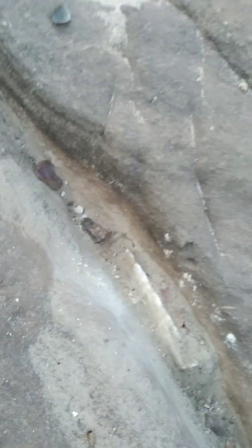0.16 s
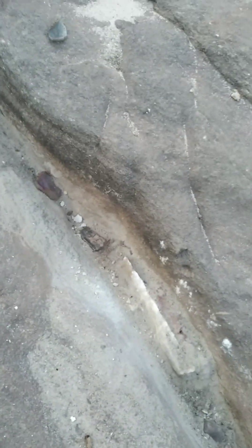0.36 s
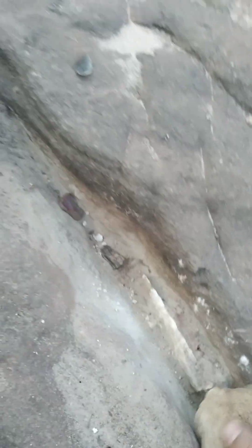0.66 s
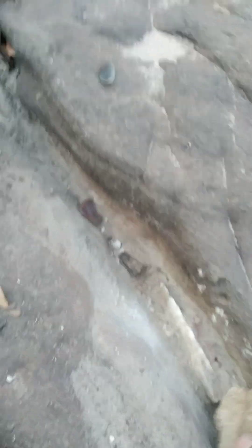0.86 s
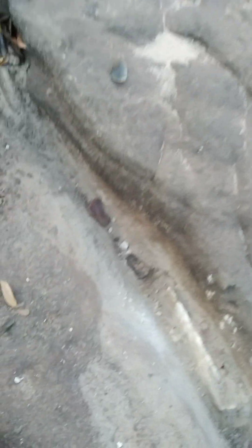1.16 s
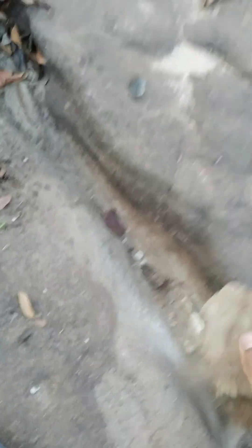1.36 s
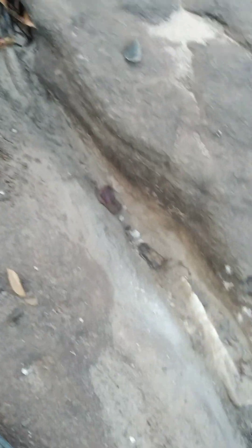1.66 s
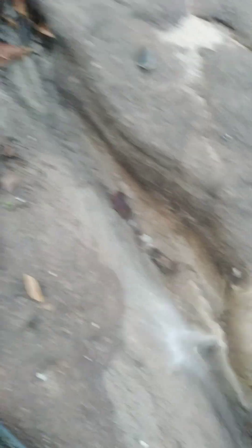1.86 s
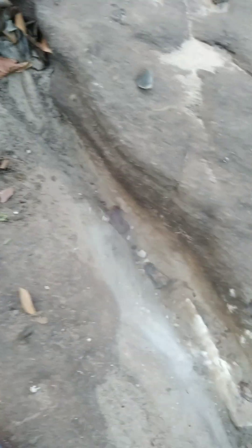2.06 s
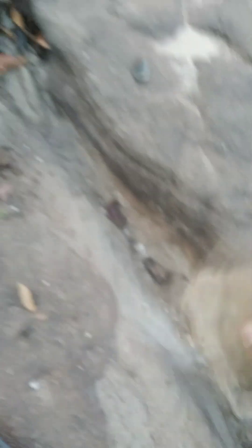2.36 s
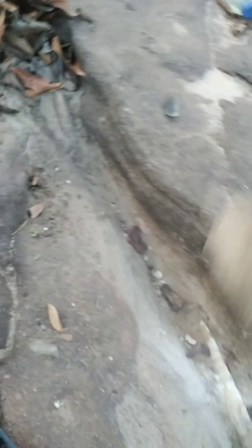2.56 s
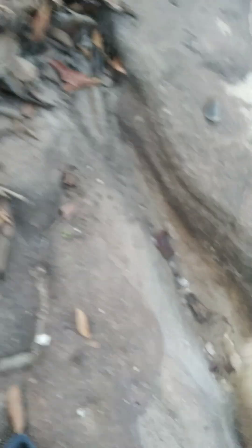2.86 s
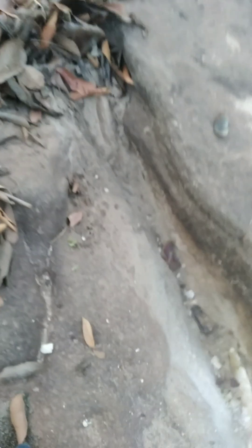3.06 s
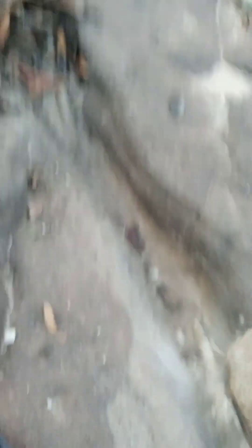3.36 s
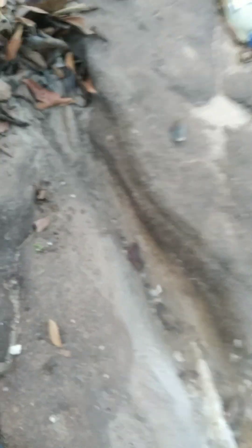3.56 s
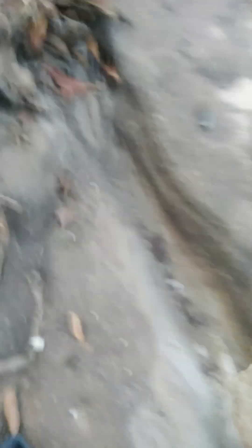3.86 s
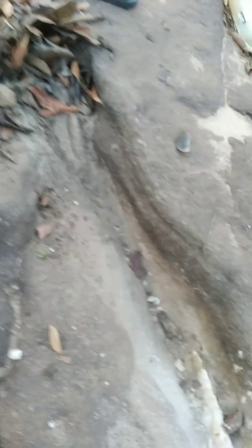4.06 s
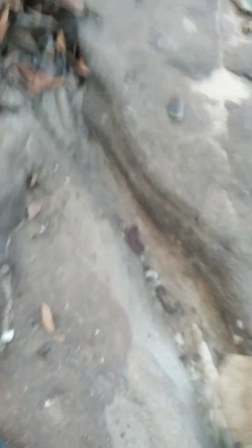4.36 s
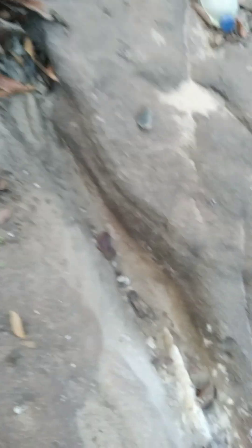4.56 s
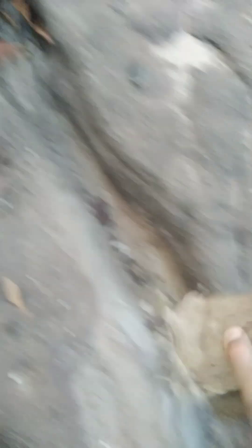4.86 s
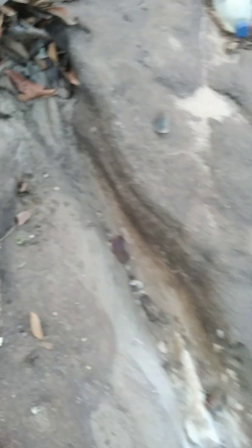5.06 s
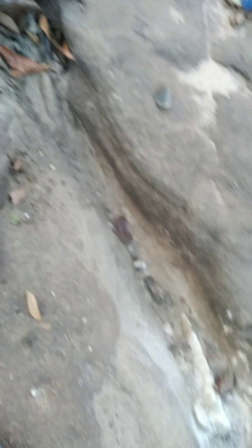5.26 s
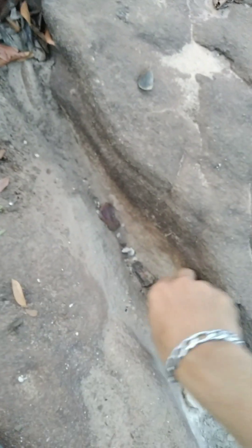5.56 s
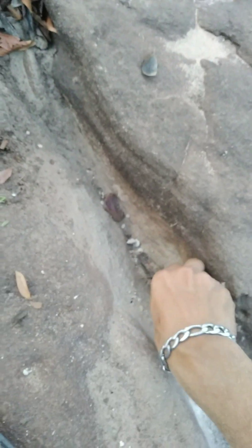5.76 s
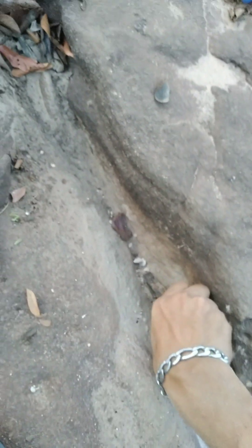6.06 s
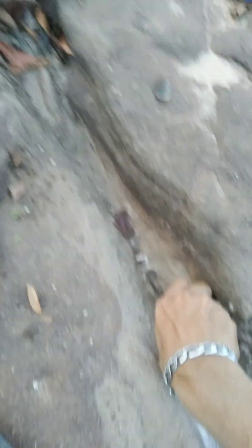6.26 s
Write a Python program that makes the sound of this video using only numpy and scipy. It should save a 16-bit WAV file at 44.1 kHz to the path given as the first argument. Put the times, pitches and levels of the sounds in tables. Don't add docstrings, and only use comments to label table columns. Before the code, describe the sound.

Outdoors on bare rock, with a faint dull wash and low rumble far off. From 0 to 0.9 s a stone is shifted in the hand: quiet gritty scrapes, small clicks and light taps close by. A near-quiet gap follows. At about 1.3 s the first hard knock lands on bedrock, then more at 1.9, 2.4, 2.9, 3.4, 3.9, 4.4 and 4.9 s, eight in all. Each is a loud, dry, very short clack with quick rebounds, a dull thud beneath and a crunch of grit, overloading the microphone on the right; the left is much softer. Between blows chips drop, sand slides and grains tick faintly. After a pause, from 5.4 to 6.2 s, the stone is set down with softer knocks, scraping and rocking among loose chips before near-quiet returns.

```python
import sys
import numpy as np
from scipy import signal
from scipy.io import wavfile
from scipy.ndimage import uniform_filter1d

SR = 44100
rng = np.random.default_rng(int(sys.argv[2]) if len(sys.argv) > 2 else 0)


def convert_level_to_amplitude(level_db):
    exponent = np.asarray(level_db, float) / 20
    return 10 ** exponent


def to_wav(sig):
    pcm = np.clip(np.atleast_2d(sig), -1, 1) * 32767
    pcm = np.round(pcm).astype(np.int16)
    wavfile.write(sys.argv[1], SR, pcm.T)


N = 282448

# start in seconds, ring level in dB, thud level in dB, crack level in dB.
BLOWS = [(1.3316, -23.5, -11, -31), (1.3337, -23, -20, -31), (1.8884, -5.5, -25, -32.5),
         (1.8900, -9, -8.5, -36.5), (2.4179, -2.5, -9, -24.5), (2.419, -11, -13, -23.5),
         (2.8804, -5, -8.5, -24), (2.8894, -14, -7, -28.5), (3.3722, -26.5, -30, -35.5),
         (3.3734, -1, -8, -25), (3.3747, -12, -16.5, -30.5), (3.4064, -13.5, -18, -17),
         (3.8609, -23, -35.5, -36), (3.8614, -5, -10, -27.5), (3.8640, -11.5, -20, -35),
         (4.3718, -3, -13, -25), (4.3740, -6, -15, -45), (4.3781, -6, -14, -46.5),
         (4.8835, -12, -13, -21.5), (4.8850, -5.5, -22, -54)]
# start in seconds, ring, thud and crack levels in dB.
SHIFTS = [(0.119, -65, -52, -75), (0.262, -45, -45, -86), (0.3144, -64, -52, -86), (0.3442, -58, -54, -73),
          (0.406, -52, -70, -81), (0.4394, -50, -42, -78), (0.539, -34.5, -55, -65),
          (0.6421, -56, -38, -52), (0.788, -41.5, -56, -65), (0.8017, -40, -30, -49),
          (0.8652, -47, -56, -54.5)]
# start in seconds, ring, thud and crack levels in dB.
FALLS = [(1.9588, -31, -33, -56), (2.1023, -31.5, -41.5, -50.5), (2.172, -36, -46, -56),
         (2.25, -52, -55, -59), (2.3113, -64, -72, -59), (2.7032, -30, -66, -37), (2.7861, -46, -61, -55.5),
         (3.03, -44.5, -46, -56.5), (3.4356, -30, -36, -44), (3.7462, -42, -62, -50.5),
         (3.9172, -36, -36, -60), (4.5131, -50, -57, -65.5)]
# start in seconds, ring, thud and crack levels in dB.
SET_DOWN = [(5.3683, -23, -24, -41), (5.4063, -24, -30, -64), (5.4477, -40, -12.5, -57.5),
            (5.4779, -40.5, -28.5, -66.5), (5.4974, -43, -66, -57), (5.5612, -28.5, -33, -44),
            (5.6569, -56, -34, -55), (5.6738, -60, -42.5, -59), (5.702, -46, -75, -57.5),
            (5.8084, -36, -25, -54), (5.8384, -30, -27, -68), (5.896, -68, -44, -43.5),
            (5.9029, -38, -32, -48), (6.0028, -49, -48, -48), (6.0529, -31, -23, -42),
            (6.1488, -49, -58, -61)]
# start in seconds, level in dB.
SLIPS = [(0.002, -48), (0.029, -43), (0.047, -43), (0.057, -43), (0.084, -44), (0.096, -42), (0.444, -43),
         (0.472, -35), (0.488, -36), (0.508, -33), (0.52, -38), (0.53, -36), (0.54, -33), (0.56, -39),
         (0.566, -39), (0.615, -42), (0.627, -36), (0.667, -36), (0.726, -54), (0.847, -39), (2.907, -35),
         (2.917, -32), (2.933, -31), (2.944, -26), (3.884, -32), (3.899, -34), (4.409, -34), (4.433, -36),
         (4.448, -38), (4.908, -33), (4.924, -30), (4.946, -32), (5.585, -37), (5.919, -40), (5.948, -41),
         (5.972, -48), (6.017, -37), (6.03, -30), (6.074, -45), (6.112, -49)]


def rms_one(x):
    return x / np.sqrt(np.mean(x ** 2) + 1e-20)


def at_hz(points, hz):
    table_hz, value = np.transpose(points)
    return np.interp(np.log(hz), np.log(table_hz), value)


def drift(rate):
    knots = rng.standard_normal(1500)
    return np.interp(np.arange(N) * rate / SR, np.arange(len(knots)), knots)


def wash(patchy_db):
    # frequency in Hz, density in dB per Hz.
    spectrum = [(20, 0), (40, -5), (65, -5.5), (100, -9), (150, -10.5), (220, -14.5), (330, -15),
                (555, -20.5), (800, -24), (1830, -29.5), (3460, -42), (8000, -54.5), (15000, -58.5)]
    # frequency in Hz, left over right in dB.
    balance = [(25, 3.5), (60, -8), (200, -7), (1000, -3.5), (4000, -1), (10000, -4.5)]
    # frequency in Hz, likeness of the two ports from 0 to 1.
    likeness = [(40, .25), (160, 0.97), (500, 0.2), (1500, .02)]
    # time in seconds, overall level in dB.
    swell = [(0.0, -50), (0.28, -56.5), (0.66, -53.5), (1.0, -57.5), (5.1, -56.5), (5.55, -56),
             (5.95, -52.5), (6.15, -57.5)]
    out = 0
    edges = 20 * 2 ** np.arange(0, 9.8, .5)
    white = rng.standard_normal((2, 2, N))
    for k, (low, high) in enumerate(zip(edges, edges[1:])):
        band = signal.butter(2, [low, high], "band", fs=SR, output="sos")
        mid, side = signal.sosfilt(band, white[k % 2])
        hz = np.sqrt(low * high)
        alike = np.clip(at_hz(likeness, hz), 0, 1)
        lean = at_hz(balance, hz) / 2
        pair = np.sqrt(1 + alike) * mid + np.sqrt(1 - alike) * side * [[1], [-1]]
        flicker_db = patchy_db * (drift(7.5) + 15 / (hz + 20) * drift(25))
        out = out + convert_level_to_amplitude(at_hz(spectrum, hz) + flicker_db) * pair * convert_level_to_amplitude(np.array([[lean], [-lean]]))
    s, level_db = np.transpose(swell)
    return rms_one(out) * convert_level_to_amplitude(np.interp(np.arange(N) / SR, s, level_db) + .5)


def drones(left_db):
    # frequency in Hz, width in Hz, level in dB.
    rumbles = [(65, 22, -63.5), (156, 18, -66)]
    out = np.zeros((2, N))
    for hz, width_hz, level_db in rumbles:
        r = np.exp(-np.pi * width_hz / SR)
        white = rng.standard_normal((2, N))
        resonance = [1, 0, -1, 1, -2 * r * np.cos(2 * np.pi * hz / SR), r * r]
        hum = signal.sosfilt([resonance] * 2, white + 0.95 * white[1])
        out += rms_one(hum) * convert_level_to_amplitude(level_db + np.array([[left_db], [0]]))
    return out


def grit_levels():
    # start in seconds, length in seconds, start and end levels in dB.
    crush = [
        (1.338, .05, -44.5, -56),
        (1.895, .035, -49, -56),
        (2.426, .055, -43, -50),
        (2.892, .037, -31, -40),
        (2.93, .022, -37.5, -37.5),
        (3.38, .025, -28, -51.5),
        (3.869, .055, -35, -47.5),
        (4.382, .04, -41, -34.5),
        (4.427, .032, -40.5, -47.5),
        (4.886, .065, -43, -37),
    ]
    # start in seconds, length in seconds, start and end levels in dB.
    drags = [(0.028, .085, -45.5, -48.5), (0.442, .04, -44.5, -55), (0.478, .07, -43.5, -45),
             (.558, .015, -37, -43.5), (0.614, .035, -41.5, -51.5), (0.677, .07, -64, -58),
             (0.841, .028, -42, -64), (1.08, .14, -65, -66.5), (1.943, .025, -38, -58),
             (5.578, .04, -43.5, -55.5), (5.62, .16, -63, -56), (5.78, .07, -55.5, -48),
             (5.895, .075, -40, -49), (5.97, .03, -50, -57), (5.998, .04, -47, -40.5),
             (6.07, .085, -47, -57), (6.2, .06, -67, -54.5)]
    # start in seconds, length in seconds, start and end levels in dB.
    settle = [(0, .03, -51.5, -53.5), (.12, .13, -68, -71), (.786, .04, -58, -56), (2.479, .08, -67, -66.5),
              (2.952, .05, -65, -57), (3.41, .045, -52, -56.5), (3.929, .11, -62, -59),
              (5.369, .16, -61, -69)]
    # start in seconds, length in seconds, start and end levels in dB.
    sand = [(0.659, .018, -48, -57), (1.57, .04, -68, -70), (1.998, 0.022, -62, -71),
            (2.066, .04, -46.5, -52.5), (2.105, .045, -58, -66), (2.61, .03, -61, -71),
            (2.684, .035, -48.5, -61.5), (3.502, .2, -58, -79.5), (4.104, .025, -54, -62),
            (4.5, .04, -67, -62.5), (5.547, .032, -58.5, -65)]
    t, shares = np.arange(N) / SR, np.zeros((3, N))
    for rows, bright_db, dull_db in [(crush, -16.5, -1.5), (drags, -11, -4), (settle, -10, 7.5), (sand, -4.5, -3)]:
        for s, length, start_db, end_db in rows:
            part = slice(int(s * SR), int((s + length) * SR))
            level_db = np.interp(t[part], [s, s + length], [start_db, end_db])
            shares[:, part] += convert_level_to_amplitude(level_db + np.array([[0], [bright_db], [dull_db]]))
    return shares


def grit(per_s, uneven_db, trickle_per_s, trickle_db):
    clumps = convert_level_to_amplitude(4 * drift(60) + 6 * drift(170))
    draw = rng.random(N)
    sizes = convert_level_to_amplitude(uneven_db * np.minimum(rng.exponential(1, N), 4))
    dragged = grit_levels() * rms_one((draw < per_s * clumps / SR) * sizes)
    trickle = convert_level_to_amplitude(trickle_db + np.array([[0], [-4], [-6]]))
    fallen = (draw > 1 - trickle_per_s / SR) * np.minimum(sizes, 2) * trickle
    at = np.flatnonzero(dragged[0] + fallen[0])
    return at, (dragged + fallen)[:, at]


def contacts(starts, chatter_s):
    delays = np.cumsum(rng.uniform(.4, 1, (len(starts), 3)), axis=1) * chatter_s - chatter_s
    return ((starts[:, None] + delays) * SR).astype(int)


def ring(clicks, hz, t60, lead):
    r, w = convert_level_to_amplitude(-60 / (t60 * SR)), 2 * np.pi * hz / SR
    softness = 0.36
    q = np.exp(-hz / SR / softness)
    rounding = [(1 - q * q) / 2, 0, (q * q - 1) / 2, 1, -2 * q * np.cos(w), q * q]
    mode = [np.sin(lead), r * np.sin(w - lead), 0, 1, -2 * r * np.cos(w), r * r]
    return signal.sosfilt([rounding, mode], clicks + 1e-18)


def stone(spread_db, grit_left_db):
    # frequency in Hz, level in dB, t60 in seconds, left level in dB, left lead in rad.
    low_modes = [(60, -20, .022, -3.5, .3), (140, -14.5, 0.018, -3, 0.23), (290, -18, 0.015, -1.5, 0.27),
                 (454, 7, 0.0091, -2.5, 0.87), (598, -2.5, 0.0067, -4, 0.47)]
    # frequency in Hz, level in dB, t60 in seconds, left level in dB, left lead in rad.
    middle_modes = [(844, 0, 0.017, -3.3, 0.5), (1000, -2, 0.017, -1.2, 1.4), (1170, -7, 0.0083, 0, 2.5)]
    # frequency in Hz, level in dB, t60 in seconds, left level in dB, left lead in rad.
    upper_modes = [(1522, -1, 0.016, 1, 3.24), (1574, 1, 0.013, -1.5, 4), (1806, -3.5, 0.018, 1, 3.45),
                   (2241, 1, 0.014, 1.5, 1.57), (2450, -7, 0.014, 0.5, 5.4), (2770, -8.5, 0.012, 8.5, -2)]
    # frequency in Hz, level in dB, t60 in seconds, left level in dB, left lead in rad.
    top_modes = [(3156, 6.5, 0.0047, -1, 8), (3550, -6, 0.013, -3, 1.5), (4000, -6.5, 0.012, 1, 11.5),
                 (4280, -5, 0.0066, 7.5, 1), (5600, -5.5, 0.0034, -2.5, 7.4), (6900, -9.5, 0.002, -6, -3.7),
                 (8200, -16, 0.0023, -7.5, 5.5), (10500, -25, .004, -8, 1.5), (12700, -35, .003, -8, -2.9)]
    # middle modes over the mean of ring and thud in dB, left over right in dB
    kinds = [(BLOWS, 0.5, -14), (SHIFTS, 10, -15), (FALLS, -9, -11), (SET_DOWN, 1.5, -13)]
    rows = np.array([(s, ring_db, thud_db, (ring_db + thud_db) / 2 + over_db, crack_db, side_db)
                     for kind, over_db, side_db in kinds for s, ring_db, thud_db, crack_db in kind])
    starts, ring_db, thud_db, middle_db, crack_db, side_db = rows.T
    touch = contacts(starts, chatter_s=.0008)
    grain, (plain, bright, dull) = grit(per_s=1900, uneven_db=4, trickle_per_s=40, trickle_db=-54)
    # modes, push of each contact in dB, push of each grain, likeness of the grains at the two ports
    groups = [(upper_modes, ring_db - 5, convert_level_to_amplitude(-25) * plain, 0.13), (low_modes, thud_db + 3, convert_level_to_amplitude(-23.5) * dull, 0.59),
              (middle_modes, middle_db + 1.5, convert_level_to_amplitude(-20) * dull, 0.28), (top_modes, crack_db + 5, convert_level_to_amplitude(-23) * bright, 0.1)]
    out = np.zeros((2, N))
    for modes, push_db, snaps, alike in groups:
        for hz, mode_db, t60, left_db, lead in modes:
            force = np.zeros((2, N))
            chance = rng.standard_normal((len(rows), 4))
            rebounds = np.c_[np.ones(len(rows)), .3 * chance[:, 1:3]]
            size = convert_level_to_amplitude(push_db + spread_db * chance[:, 0])[:, None] * rebounds
            np.add.at(force[1], touch, size)
            np.add.at(force[0], touch, size * convert_level_to_amplitude(side_db[:, None] + 2 * chance[:, 3:]))
            own, shared = rng.standard_normal((2, len(grain)))
            sharp = max(hz / 4000, 1) ** .7
            grain_left = convert_level_to_amplitude(grit_left_db) * (alike * shared + (1 - alike) * own)
            force[:, grain] += sharp * snaps * [grain_left, shared]
            out[0] += convert_level_to_amplitude(mode_db + left_db) * ring(force[0], hz, t60, lead)
            out[1] += convert_level_to_amplitude(mode_db) * ring(force[1], hz, t60, 0)
    return out


def slips(spread_db):
    # frequency in Hz, level in dB.
    slip_modes = [(520, -12), (1000, 1), (1600, -3), (2300, -2), (3300, -17), (4400, -16), (6500, -26)]
    chance = rng.standard_normal((len(SLIPS), len(slip_modes), 2))
    taps = []
    for (s, level_db), row in zip(SLIPS, chance):
        for (hz, mode_db), (late, odd) in zip(slip_modes, row):
            taps.append((s + .0004 * late, hz, level_db + mode_db - 1 + spread_db * odd))
    return taps


def rings():
    # start in seconds, frequency in Hz, level in dB.
    blow_rings = [(1.3335, 2850, -22), (1.3321, 450, -2), (1.3325, 4250, -28), (1.3315, 755, -5),
                  (1.3330, 1466, -4), (1.8885, 670, -1), (1.8893, 3500, -15), (1.8898, 960, -4),
                  (1.8890, 1690, -6.5), (1.8895, 2450, -5), (1.8906, 3120, -13), (1.889, 4350, -24),
                  (2.418, 3470, -15), (2.418, 4570, -22), (2.4192, 1000, -5), (2.4186, 1550, -12),
                  (3.374, 5500, -24), (3.3738, 2260, -6), (3.374, 3350, -18), (3.406, 2060, -18),
                  (4.8849, 441, -3), (4.884, 3400, -12), (4.374, 700, -6), (4.374, 1170, -9),
                  (2.4185, 520, -11), (2.4180, 833, 2), (2.4176, 2301, -7), (2.88, 395, -12),
                  (2.8800, 806, 2), (2.8888, 673, -1), (2.8885, 1537, -3.5), (3.374, 390, -1),
                  (3.372, 511, -4), (3.374, 990, 1), (3.4069, 508, -15), (3.4062, 5500, -21),
                  (3.4062, 2600, -19), (3.862, 3000, -15), (3.863, 1260, -8), (3.862, 530, -7),
                  (3.8625, 1000, 3.5), (3.8616, 2230, -4), (3.8631, 1573, -2.5), (4.3720, 1000, -4),
                  (4.3712, 1585, -3.5), (4.372, 1985, -0.5), (4.8838, 873, -5), (4.8836, 1528, -6.5),
                  (4.884, 1930, -9)]
    # start in seconds, frequency in Hz, level in dB.
    tap_rings = [(0.2613, 1000, -28), (.803, 150, -27), (2.173, 980, -36), (2.1736, 2450, -31),
                 (2.1722, 3380, -37.5), (3.0318, 2900, -38), (3.7457, 6900, -44), (5.4074, 1070, -14.5),
                 (5.4084, 1540, -21), (5.448, 400, -7), (5.369, 620, -17), (3.883, 800, -26),
                 (2.704, 1850, -34), (5.8085, 760, -21), (5.8382, 1000, -15.5), (6.054, 170, -20)]
    # start in seconds, level in dB.
    thumps = [
        (1.332, -21),
        (1.889, -15),
        (2.418, -21),
        (2.881, -15),
        (3.374, -12),
        (3.407, -21),
        (3.862, -11),
    ]
    # start in seconds, frequency in Hz, level in dB.
    ticks = [(1.4077, 3500, -52), (2.3112, 5260, -46), (2.4573, 5500, -46), (2.512, 4500, -54),
             (2.6195, 4500, -47), (2.8375, 5000, -48), (2.8375, 2400, -50), (2.861, 3000, -48),
             (3.024, 4500, -52), (3.1099, 4500, -51), (3.1099, 10000, -56), (3.119, 11000, -58),
             (3.2166, 2600, -50), (3.2166, 6000, -58), (3.251, 6500, -56), (3.2974, 4200, -50),
             (3.306, 3000, -54), (3.4621, 4000, -52), (4.1031, 5000, -48), (4.114, 6000, -52),
             (4.5221, 3400, -48), (4.549, 4500, -56), (4.6499, 3000, -54), (4.718, 3500, -54),
             (4.753, 3800, -52), (4.784, 2800, -53), (4.836, 2800, -51), (4.9202, 2300, -38)]
    # frequency in Hz, left over right in dB.
    balance = [(200, -11), (600, -16), (1000, -12), (1600, -11), (3000, -9)]
    booms = [(s, 120, level_db) for s, level_db in thumps]
    sand_ticks = [(s, hz, level_db - 4.5) for s, hz, level_db in ticks]
    out, click = np.zeros((2, N)), np.eye(1, 1600)[0]
    for rows, t60 in [([*blow_rings, *booms], .012), (tap_rings, .009), (sand_ticks, .004), (slips(spread_db=3), .009)]:
        for s, hz, level_db in rows:
            lasts = t60 * min(1000 / hz, 1) ** .3
            left = convert_level_to_amplitude(at_hz(balance, hz)) * ring(click, hz, lasts, hz / 800)
            right = ring(click, hz, lasts, 0)
            start = int(s * SR)
            out[:, start:start + len(click)] += convert_level_to_amplitude(level_db + 5) * np.array([left, right])
    return out


def dust(left_db):
    # frequency in Hz, level in dB.
    dust_bands = [(3000, -6), (5000, -8), (8000, -14), (12000, -26)]
    rise_s, t60_s = .0012, .012
    force = np.zeros(N)
    for s, ring_db, thud_db, crack_db in [*BLOWS, *SHIFTS, *FALLS, *SET_DOWN]:
        force[int((s - rise_s) * SR)] += convert_level_to_amplitude(crack_db - 10)
    for s, level_db in SLIPS:
        force[int(s * SR)] += convert_level_to_amplitude(level_db - 22)
    rise, fall = np.exp(-1 / (rise_s * SR)), convert_level_to_amplitude(-60 / (t60_s * SR))
    dying = signal.lfilter([1], [1, -fall], force + 1e-18)
    level = signal.lfilter([1 - rise], [1, -rise], dying)
    level = level + convert_level_to_amplitude(-19 + 3 * drift(90)) * uniform_filter1d(grit_levels()[1], size=130)
    white = rng.standard_normal((2, N))
    hiss = 0
    for hz, band_db in dust_bands:
        band = signal.butter(2, [hz / 1.3, hz * 1.25], "band", fs=SR, output="sos")
        hiss = hiss + convert_level_to_amplitude(band_db) * rms_one(signal.sosfilt(band, white + white[1]))
    return hiss * level * convert_level_to_amplitude(np.array([[left_db], [0]]))


def chips(left_db):
    # start in seconds, length in seconds, frequency in Hz, level in dB.
    sung_chips = [(0.027, 0.076, 1000, -52.5), (0.02, 0.085, 4000, -68), (0.03, 0.08, 2300, -63),
                  (.44, .11, 1000, -51.5), (0.442, .11, 2260, -53), (0.43, 0.09, 4450, -68),
                  (0.657, 0.07, 2290, -66), (0.662, 0.0089, 936, -49.5), (0.839, 0.016, 1000, -52.5),
                  (1.09, .12, 1850, -72), (2.438, 0.032, 2162, -62), (2.927, 0.021, 1630, -43),
                  (2.924, 0.029, 3870, -55.5), (3.873, 0.025, 4000, -59), (4.391, 0.028, 1650, -49),
                  (4.916, .022, 1850, -44), (4.945, .008, 1500, -43), (4.916, .03, 1000, -50),
                  (4.916, .03, 3300, -56), (4.952, .01, 900, -48), (.1, .15, 3400, -78),
                  (5.544, .03, 2450, -61), (5.575, 0.016, 2388, -47), (5.629, .03, 2450, -65),
                  (5.578, .04, 3900, -64.5), (6.0, .04, 2350, -58)]
    out, lumps = np.zeros((2, N)), convert_level_to_amplitude(5 * drift(200))
    for s, length, hz, level_db in sung_chips:
        start, size = int(s * SR), int(length * SR)
        width_hz = 280 * (hz / 1500) ** .3
        r = np.exp(-np.pi * width_hz / SR)
        rub = rng.standard_normal((3, 8000))[:, :size]
        swell = np.hanning(size) ** 0.17 * lumps[start:start + size]
        force = np.zeros((2, size + 900))
        force[:, :size] = (rub[:2] + 1.3 * rub[1]) * rub[2] ** 2 * swell
        resonance = [1, 0.00045, -0.66, 1, -2 * r * np.cos(2 * np.pi * hz / SR), r * r]
        sung = signal.sosfilt([resonance] * 2, force)
        out[:, start:start + size + 900] += rms_one(sung) * convert_level_to_amplitude(level_db - 1 + np.array([[left_db], [0]]))
    return out


def scene():
    near = stone(spread_db=2.5, grit_left_db=-9.5) + rings() + chips(left_db=-10.5) + dust(left_db=-12)
    return near + wash(patchy_db=1.5) + drones(left_db=-7)


def top_cut(x):
    return signal.sosfilt(signal.butter(12, 15640, fs=SR, output="sos"), x)


def record(dry):
    # start in seconds, length in seconds.
    shut = [(1.5672, .005), (1.6019, .003), (1.7502, .008), (3.1648, .003), (3.3167, .004), (3.5955, .0107),
            (3.7595, .009), (4.321, .009), (4.5907, .007), (4.792, .003), (6.1925, .006), (6.2525, .0085),
            (6.2656, .004)]
    clipped = np.clip(dry, -1, 1)
    level = signal.lfilter([1, -1], [1, -.998], clipped)
    low_pass = signal.cheby2(8, 30, 15600, fs=SR, output="sos")
    cut = signal.sosfilt(low_pass, level)
    gate = np.ones(N)
    for s, length in shut:
        gate[int(s * SR):int((s + length) * SR)] = 0.021
    return top_cut(cut * uniform_filter1d(gate, size=30))


dry = scene()
out = record(dry)
to_wav(out)
```